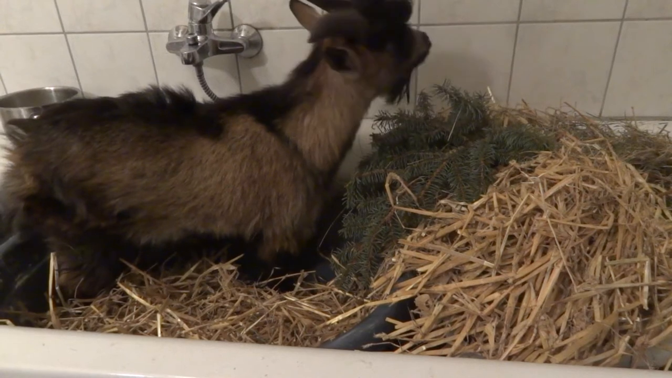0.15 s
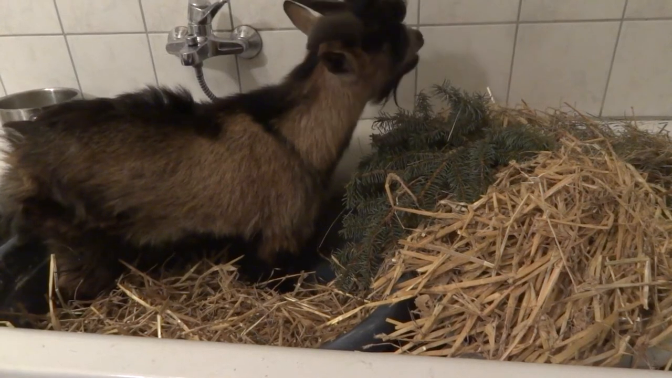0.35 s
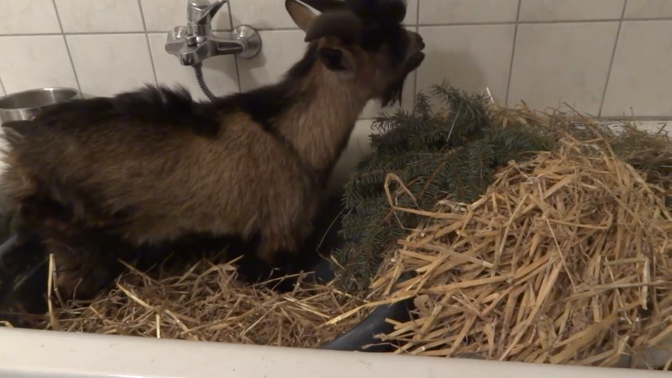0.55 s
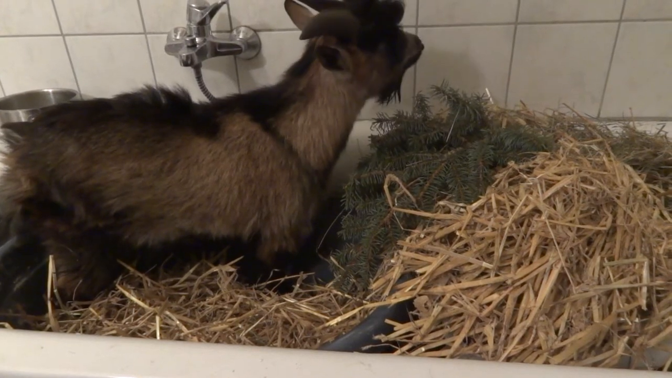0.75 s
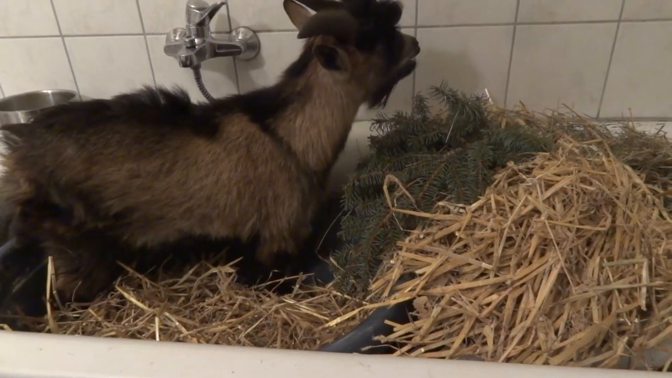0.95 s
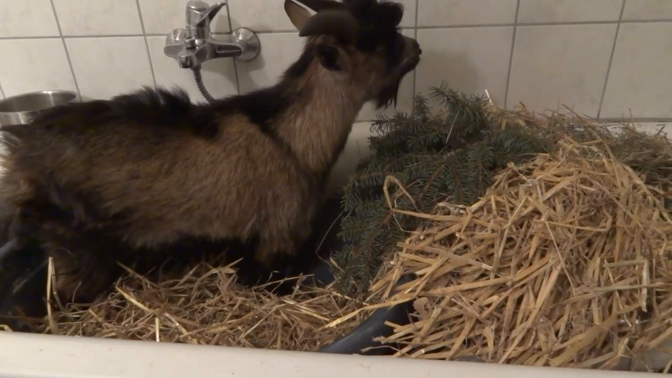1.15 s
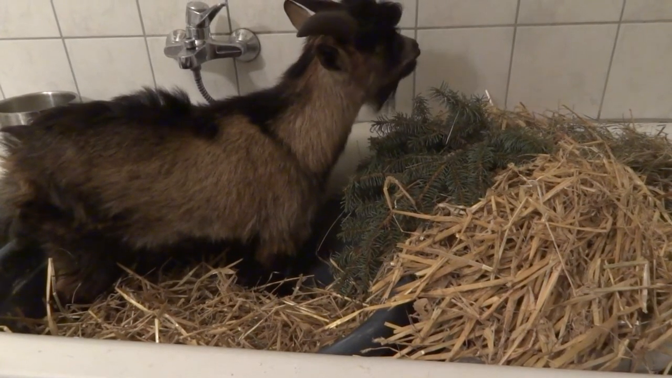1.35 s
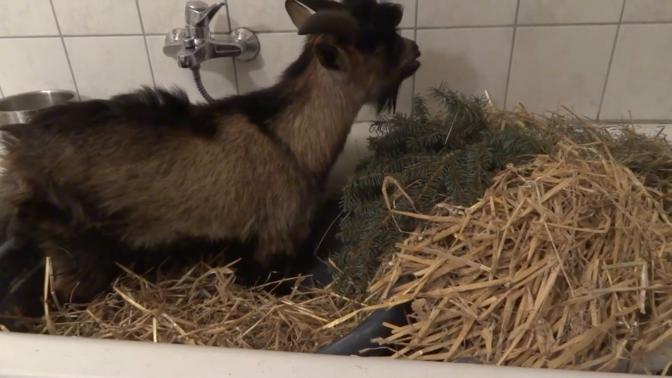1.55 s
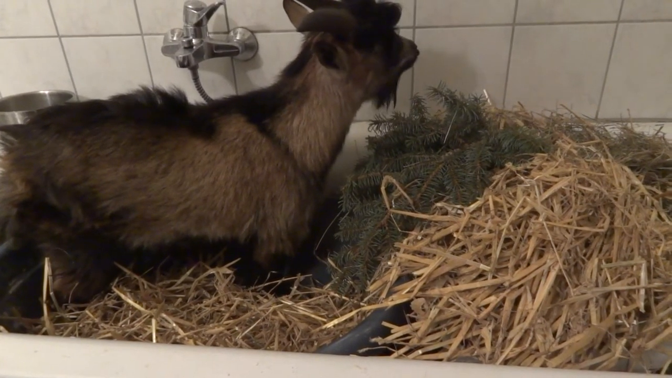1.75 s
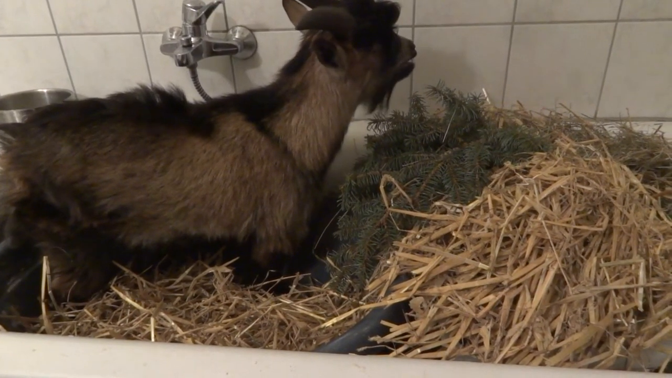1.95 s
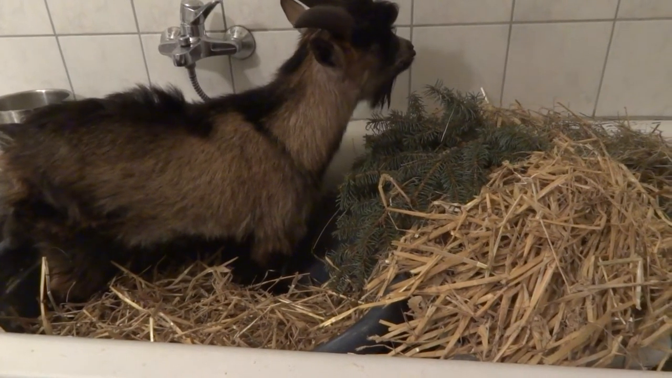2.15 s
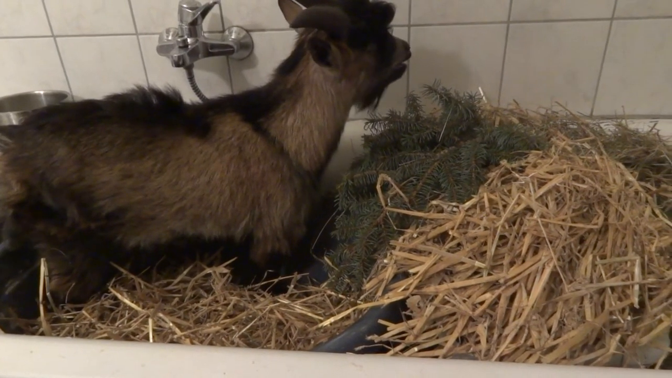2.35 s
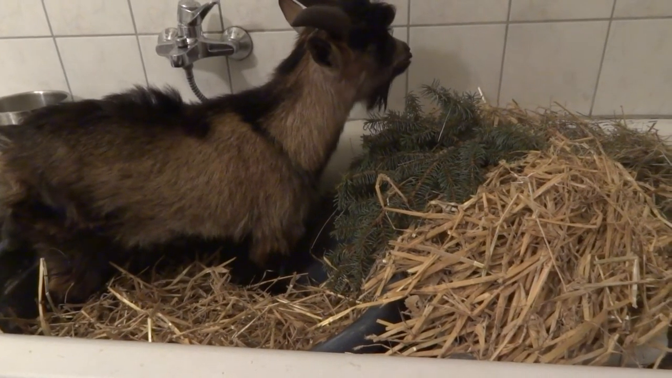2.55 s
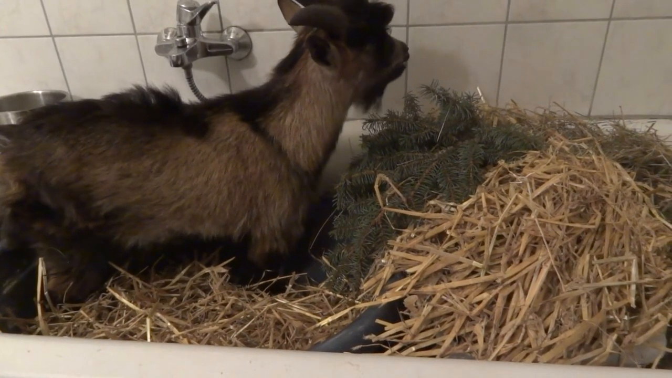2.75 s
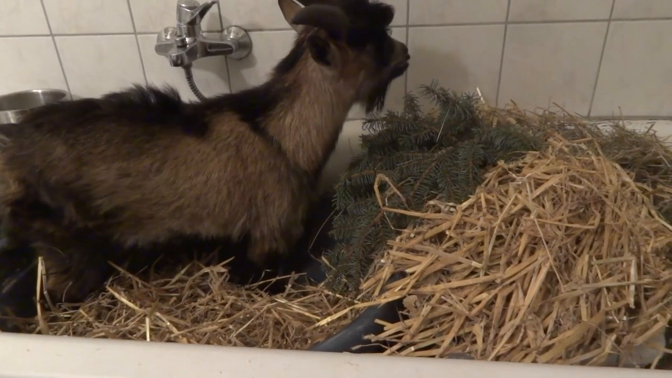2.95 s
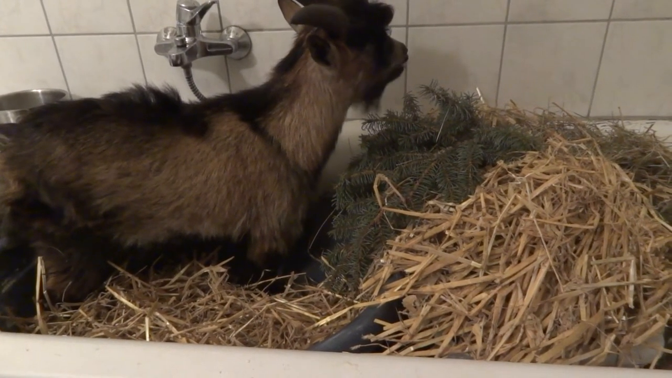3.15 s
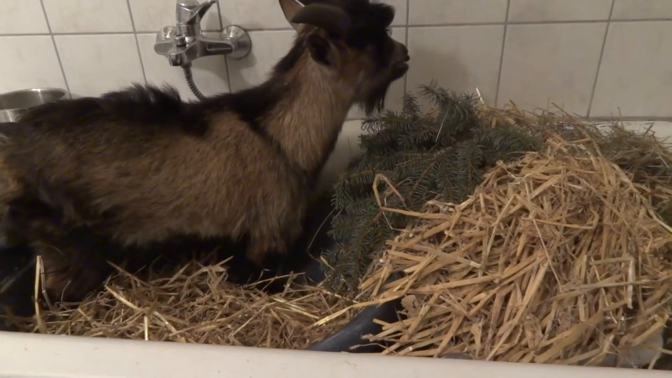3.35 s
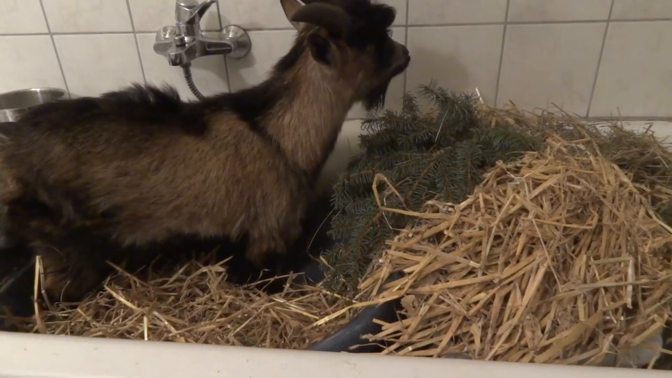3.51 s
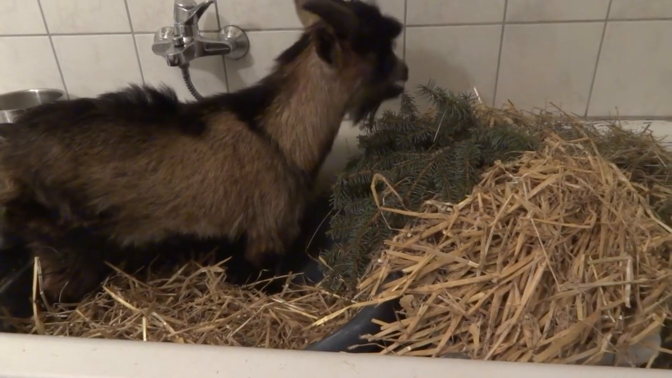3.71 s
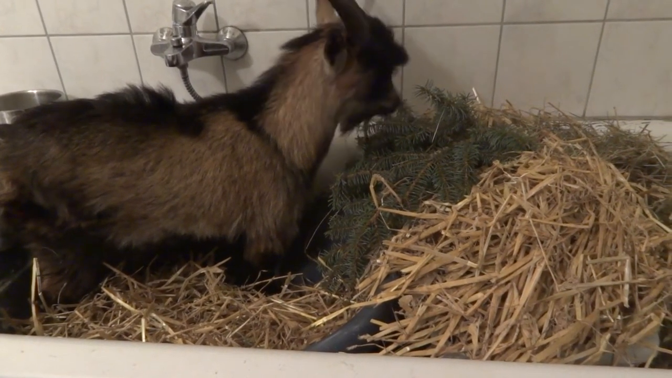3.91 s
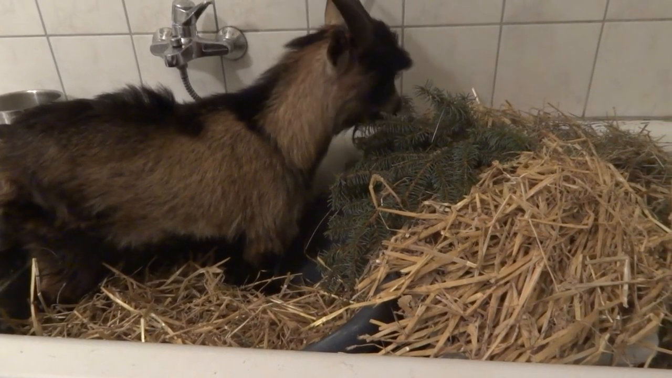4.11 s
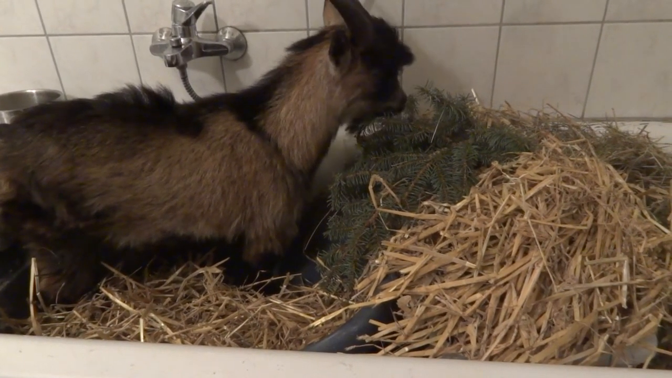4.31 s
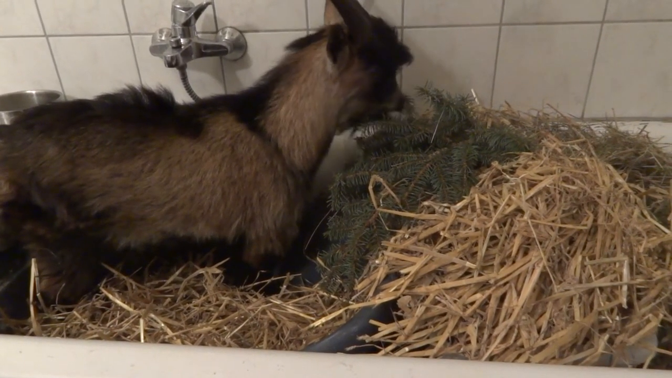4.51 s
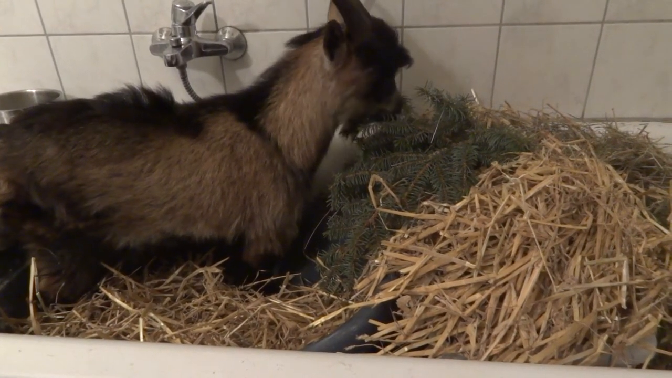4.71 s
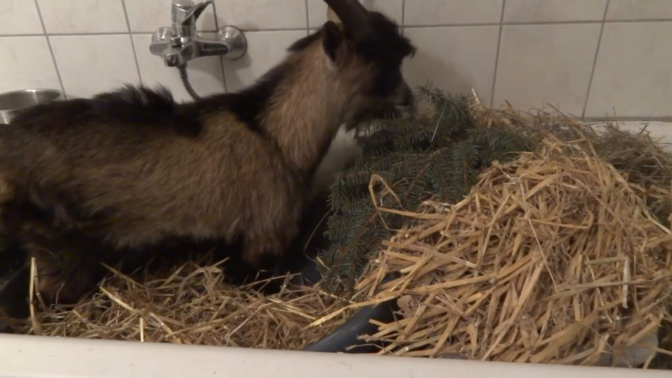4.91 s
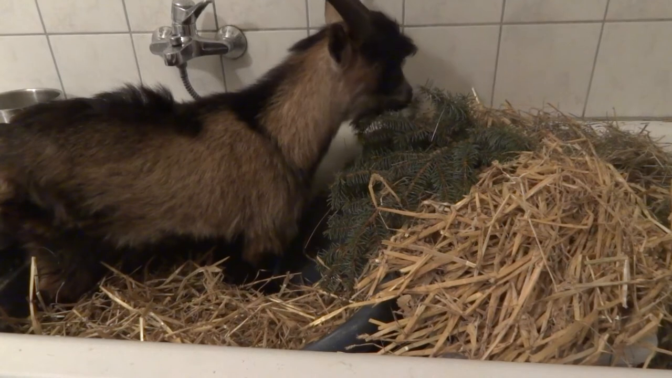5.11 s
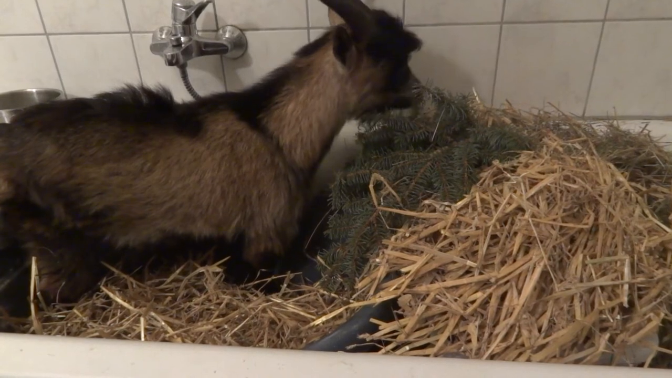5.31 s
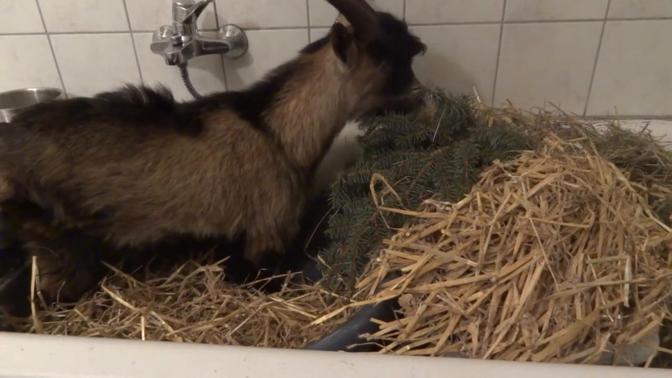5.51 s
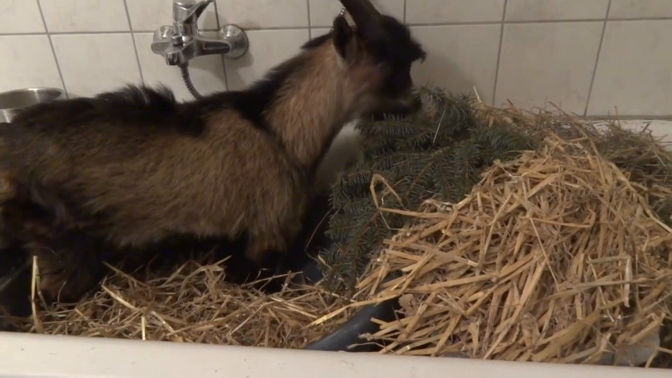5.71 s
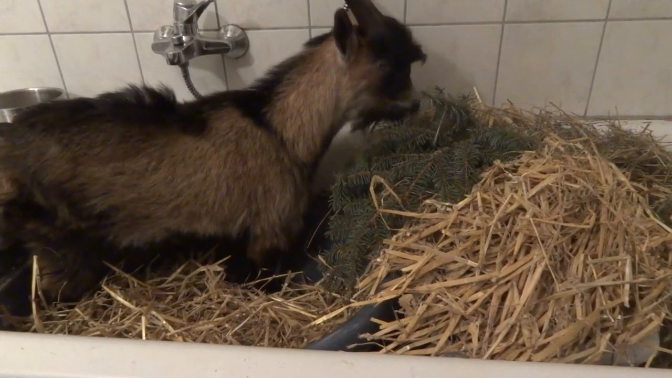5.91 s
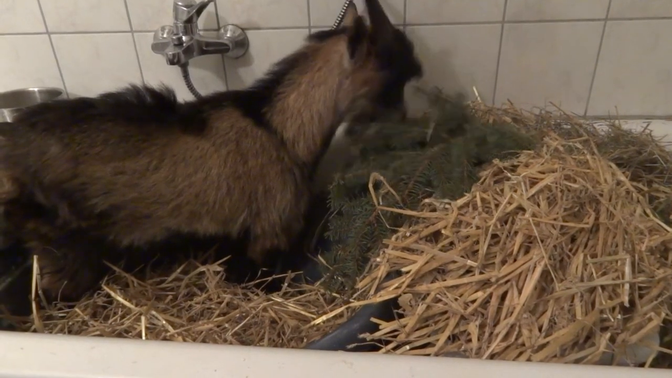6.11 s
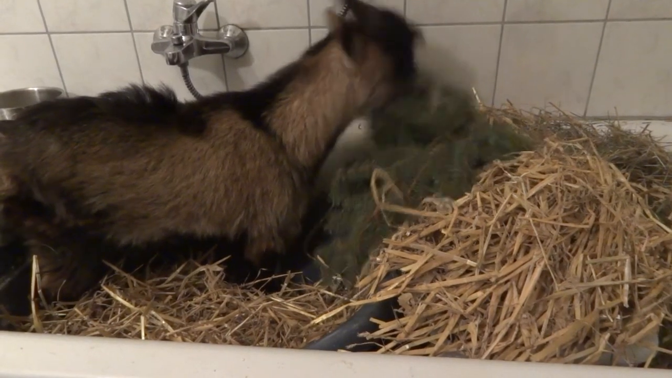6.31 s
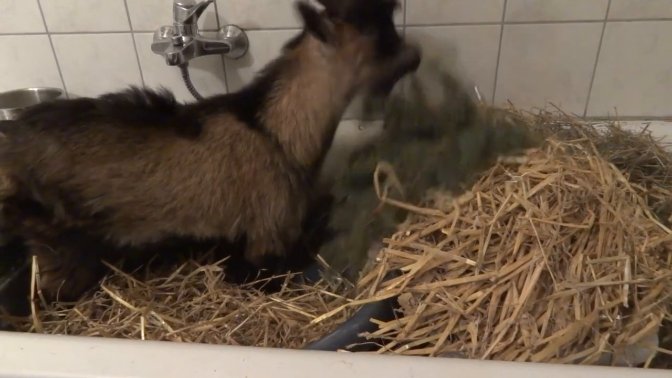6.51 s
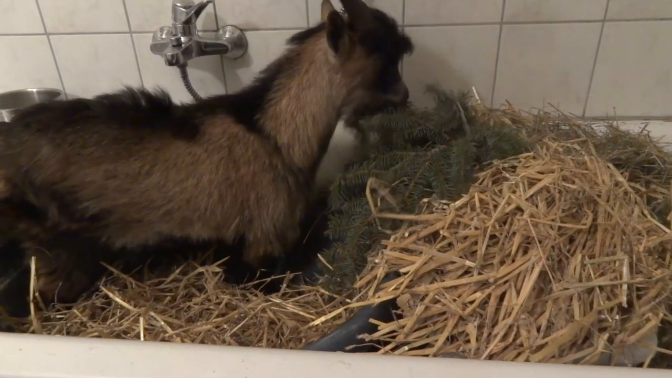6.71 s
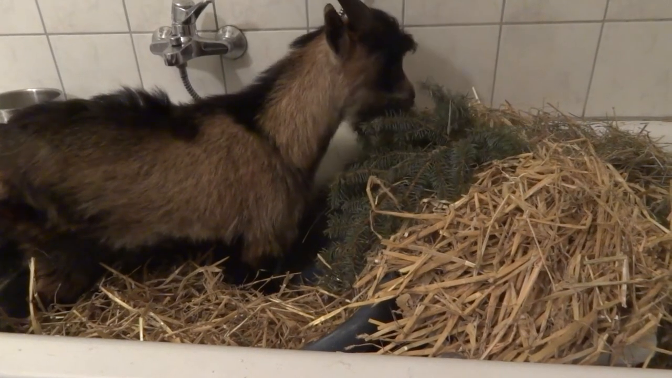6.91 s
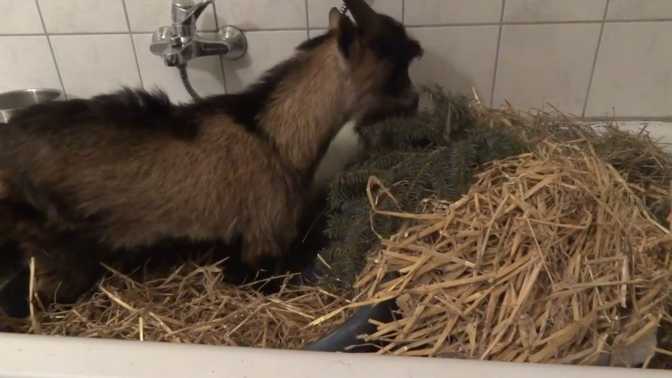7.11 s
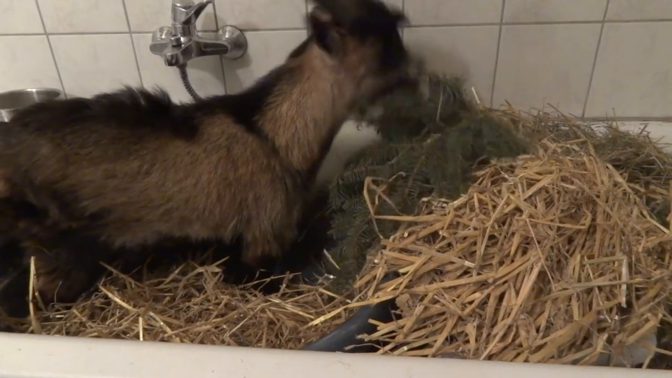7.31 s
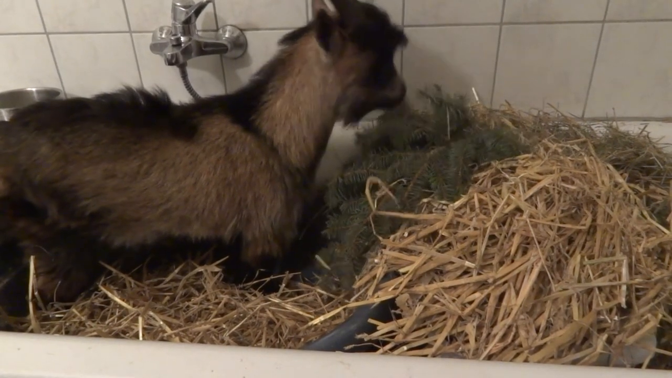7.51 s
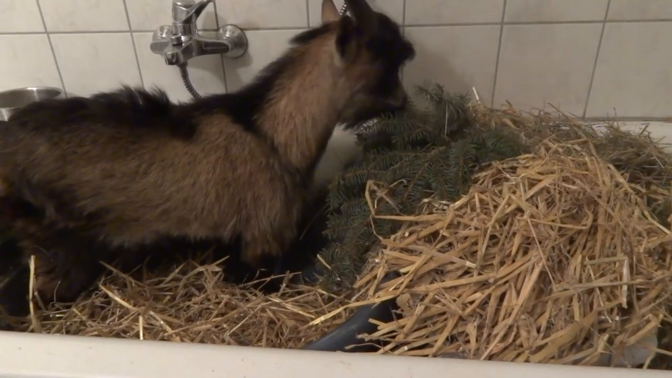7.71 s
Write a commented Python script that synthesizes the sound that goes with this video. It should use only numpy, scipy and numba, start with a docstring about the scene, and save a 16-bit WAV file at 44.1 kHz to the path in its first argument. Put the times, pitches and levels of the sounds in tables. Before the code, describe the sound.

In a quiet tiled bathroom, a nearby microphone picks up a goat steadily grinding and cracking twigs between its teeth, with small lip smacks and ticks of straw. The crunching ends a little past halfway. Then come two louder bursts of rustling evergreen branches with sharp snaps and a low, hollow rumble from the tub. A faint, fast lens motor tick sits in the background.

```python
"""Over faint room noise and a ticking lens motor, a goat crunches fir twigs, about two strokes a second.
It stands on crackling straw in a bathtub in a small tiled room. Each stroke grinds and cracks the twigs
while the mouth's resonance sinks; wet smacks fall in between. Then it tugs at the pile of branches in
two bouts: needles rustle and settle, twigs snap and the tub rumbles beneath."""
import sys
import numpy as np
from scipy import signal
from scipy.fft import rfft, irfft
from scipy.io import wavfile
from numba import njit

SR = 44100
rng = np.random.default_rng(int(sys.argv[2]) if len(sys.argv) > 2 else 0)


def wrap_up_sound(samples):
    """Save the sound to the file named by the first command line argument, as 16-bit audio."""
    columns = np.atleast_2d(samples).T
    # keep every value between -1 and 1, then stretch to whole-number steps
    tamed = np.clip(columns, -1, 1)
    steps = np.round(tamed * 32767).astype(np.int16)
    wavfile.write(sys.argv[1], SR, steps)


N = 341863
T = np.arange(N) / SR


def amp(db):
    """Decibels to gain."""
    return 10 ** (np.asarray(db) / 20)


def unit(x):
    """Scale to rms 1."""
    return x / np.sqrt(np.mean(x ** 2) + 1e-18)


def add(track, start_s, sound):
    """Mix a sound into a track."""
    i = max(int(start_s * SR), 0)
    track[i:i + len(sound)] += sound[:N - i]


def along(points, hz):
    """Read (Hz, value) points on a log-frequency axis."""
    point_hz, value = np.transpose(points)
    return np.interp(np.log(hz + 1), np.log(point_hz), value)


def colour(x, spectrum, size=4096):
    """Minimum-phase filter from (Hz, dB) points; white noise keeps its power."""
    gain = unit(amp(along(spectrum, np.fft.rfftfreq(size, 1 / SR))))
    cepstrum = irfft(np.log(gain))
    cepstrum[1:size // 2] *= 2
    cepstrum[size // 2 + 1:] = 0
    impulse = irfft(np.exp(rfft(cepstrum)))
    return signal.oaconvolve(x, impulse)[:N]


@njit
def resonate(x, hz, width_hz):
    """State-variable band-pass with a moving centre; white noise keeps its power."""
    y = np.empty(len(x))
    band_state, low_state = 0., 0.
    for i in range(len(x)):
        g = np.tan(np.pi * hz[i] / SR)
        damping = width_hz / hz[i]
        band = (band_state + g * (x[i] - low_state)) / (1 + g * (g + damping))
        band_state = 2 * band - band_state
        low_state += 2 * g * band
        y[i] = damping * band
    return y * np.sqrt(SR / (np.pi * width_hz))


def steep_band(x, hz, stage_width_hz):
    """Two resonators in series, centre steady or moving; white noise keeps its power."""
    centre_hz, width_hz = np.full(N, hz, float), float(stage_width_hz)
    once = resonate(x, centre_hz, width_hz)
    return resonate(once, centre_hz, width_hz) * np.sqrt(2 * np.pi * width_hz / SR)


def swell(peak_s, rise_s, fall_s, hold_s=0):
    """A force builds to 1, holds and lets go; rise and fall are time constants."""
    before, after = (peak_s - T) / rise_s, (T - peak_s - hold_s) / fall_s
    return np.exp(-np.maximum(np.maximum(before, after), 0))


def crackle(per_s, spread_db, size=N):
    """Tiny fractures of random time, strength and sign; rms 1."""
    happens = rng.random(size) < per_s / SR
    strength = amp(spread_db * np.minimum(rng.exponential(size=size), 4))
    return unit((happens + 1e-3) * strength * rng.choice([-1, 1], size))


def fracture(length_s):
    """A crack runs through a twig fibre by fibre, fades slightly and stops; rms 1."""
    size = int(length_s * SR) + 8
    fade = np.exp(-0.15 * np.arange(size) / size)
    return unit(crackle(per_s=7000, spread_db=3, size=size) * fade)


# Room noise spectrum. Each row: frequency in Hz, relative level in dB.
AIR_SPECTRUM = [(15, -43), (28, -13), (44, 3.5), (65, -4), (120, -3.5), (280, -4), (600, -4.5), (1100, -6),
                (1900, -9.5), (2800, -15), (5300, -12.5), (8000, -22), (11000, -26)]

def room_noise(mid_db=-70):
    """Quiet steady noise, nearly alike on both sides in the bass."""
    mid, side = (unit(colour(rng.standard_normal(N), AIR_SPECTRUM)) for _ in range(2))
    side_db = along([(60, -12), (600, 1), (2000, 1), (6000, -5)], np.fft.rfftfreq(N, 1 / SR))
    side = irfft(rfft(side) * amp(side_db), N)
    return amp(mid_db) * (mid + np.outer([1, -1], side))


def lens_motor(tick_hz=5300, tick_decay_s=.0022, tick_db=-64.5, whirr_hz=1000, whirr_db=-68):
    """The camera's lens drive ticks fifty times a second and whirrs at every second tick."""
    since_tick_s, since_whirr_s = (T - .018) % .02, (T - .021) % .04
    pulses = rng.standard_normal(N) * np.exp(-since_tick_s / tick_decay_s)
    tick = steep_band(pulses, tick_hz, stage_width_hz=2200)
    age = since_whirr_s / .0025  # each whirr peaks at age 1
    shudders = rng.standard_normal((2, N)) * age * np.exp(1 - age)
    whirr = np.array([steep_band(side, whirr_hz, stage_width_hz=1500) for side in shudders])
    return amp(tick_db) * tick + amp(whirr_db) * whirr


# Jaw strokes. Each row: hardest bite, rise and fall in seconds, relative direct and mouth levels
# in dB, mouth resonance in Hz.
JAW_STROKES = [(0.619, 0.1, 0.089, -58.5, -67.5, 960), (1.173, 0.046, 0.01, -56.5, -55.5, 847),
               (1.68, 0.16, 0.029, -55, -69.5, 765), (2.125, 0.092, 0.037, -55, -63.5, 720),
               (2.565, 0.083, 0.013, -51, -62.5, 640), (2.981, 0.1, 0.034, -58, -67, 570),
               (3.425, 0.077, 0.0054, -52, -60.5, 620), (3.86, 0.045, .03, -55.5, -60, 560),
               (4.307, 0.038, 0.0056, -47.5, -53, 442)]
# Twigs cracking between the teeth. Each row: start in seconds, relative direct and mouth levels in dB.
BITE_CRACKS = [(0.016, -43, -62), (0.462, -40.5, -85), (0.4915, -36.5, -68), (0.5413, -39, -64),
               (0.5906, -28, -56.5), (0.6215, -37, -73), (0.6759, -35.5, -56), (1.043, -37, -67),
               (1.1275, -33.5, -60), (1.1554, -28.5, -63), (1.1932, -35, -52), (1.5459, -39, -72),
               (1.5959, -29.5, -51), (1.6658, -25.5, -38), (2.1016, -32, -70), (2.4745, -37, -70),
               (2.5667, -28.5, -40.5), (2.8032, -51, -58), (2.9744, -39, -51.5), (3.1727, -46, -58.5),
               (3.3386, -41, -63), (3.431, -43, -62), (4.2457, -37, -68), (4.2961, -40, -57)]
# Crunch spectrum. Each row: frequency in Hz, relative level in dB.
CRUNCH_SPECTRUM = [(200, -22), (600, 3), (1350, -5), (1650, 0), (2200, -1.5), (2900, -2), (3500, 1.5),
                   (5200, 3), (6500, -2.5), (8500, 3), (11000, -11)]
# Steady muzzle resonances. Each row: centre in Hz, half the stage width in Hz, gain in dB.
MUZZLE_MODES = [(980, 130, 0), (1120, 130, -7), (1620, 120, -7), (2150, 400, -14)]

def chewing(open_hz=980, glide_s=0.13, sink_ratio=0.9):
    """Molars grind and crack twigs; the sound leaves directly and through the closing mouth."""
    direct, inside, glide = np.zeros(N), np.zeros(N), []
    grind = amp(-1) * crackle(per_s=2200, spread_db=6)
    for bite_s, rise_s, fall_s, direct_db, mouth_db, hz in JAW_STROKES:
        stroke = swell(bite_s, rise_s, fall_s) * grind
        direct += amp(direct_db) * stroke
        inside += amp(mouth_db) * stroke
        # The cavity's pitch sinks through the stroke and recovers as the jaw opens.
        glide += [(bite_s - glide_s, open_hz), (bite_s, hz), (bite_s + glide_s / 2, hz * sink_ratio)]
    for start_s, direct_db, mouth_db in BITE_CRACKS:
        crack = fracture(length_s=0.005)
        add(direct, start_s, amp(direct_db - 12) * crack)
        add(inside, start_s, amp(mouth_db - 3) * crack)
    cavity_hz = np.interp(T, *np.transpose(glide))
    cavity = amp(-1) * steep_band(inside, cavity_hz, stage_width_hz=270)
    muzzle = sum(amp(db) * steep_band(inside, hz, 2 * half_hz) for hz, half_hz, db in MUZZLE_MODES)
    return soften(colour(direct, CRUNCH_SPECTRUM)) + cavity + muzzle


def soften(crunch, split_hz=4000, soak_span_s=(0.5, 2.73)):
    """The mouthful starts dry and crisp and grows duller as it is wetted and ground."""
    low = signal.sosfiltfilt(signal.butter(3, split_hz, fs=SR, output="sos"), crunch)
    low_db = np.interp(T, soak_span_s, [-8, 2])
    high_db = np.interp(T, soak_span_s, [2, -2])
    return amp(low_db) * low + amp(high_db) * (crunch - low)


# Single stalks ticking. Each row: start in seconds, level in dB.
STALK_TICKS = [(.137, -54), (0.28, -54), (.317, -56), (.931, -55.5), (1.473, -51.5), (2.015, -53),
               (2.051, -51), (4.880, -50.5)]
# The goat shifting its weight. Each row: peak, rise and fall in seconds, level in dB.
WEIGHT_SHIFTS = [(.1, .4, 0.29, -64), (1.4, 0.33, .3, -78), (2.334, 0.019, 0.046, -58.5)]
# Spectra of a stalk's tick and of rustling straw or needles. Each row: frequency in Hz, relative dB.
STALK_SPECTRUM = [(1000, -46), (4000, -21), (7000, -29), (9300, -13.5), (11500, -25.5)]
RUSTLE_SPECTRUM = [(300, -27.5), (1200, -21.5), (3000, -11), (4300, -6.5), (5400, -2.5), (6300, -6),
                   (8000, -1), (9800, -3.5), (11200, -13)]

def straw(stir_db=-71.5, fade_db_per_s=1.2):
    """Bedding crackles under the goat's weight, dying down as it stands still; single stalks tick."""
    ticks = np.zeros(N)
    for start_s, db in STALK_TICKS:
        add(ticks, start_s, amp(db) * fracture(length_s=0.0022))
    load = amp(stir_db - fade_db_per_s * T)
    for peak_s, rise_s, fall_s, db in WEIGHT_SHIFTS:
        load = np.hypot(load, amp(db) * swell(peak_s, rise_s, fall_s))
    stir = load * crackle(per_s=1200, spread_db=3.5)
    return colour(ticks, STALK_SPECTRUM) + colour(stir, RUSTLE_SPECTRUM)


# Hooves and branches pushing on the tub. Each row: peak, rise and fall in seconds, relative boom and
# scrape levels in dB, boom pitch in Hz.
TUB_PUSHES = [(.197, 0.012, 0.006, -72, -54.5, 245), (.218, 0.022, 0.018, -55, -85, 149),
              (4.322, 0.011, 0.018, -56.5, -87, 374), (6.155, 0.029, 0.012, -52.5, -50.5, 254),
              (6.23, 0.034, 0.014, -62.5, -64, 420), (6.45, 0.026, 0.013, -48.5, -72, 221),
              (6.535, 0.011, 0.019, -47.5, -42, 400), (6.575, 0.019, 0.046, -59, -56, 186),
              (7.345, 0.058, 0.077, -56.5, -55, 257)]
# Tub modes. Each row: centre in Hz, stage width in Hz, relative gain in dB.
TUB_MODES = [(121, 28, -5.5), (185, 59, -2), (228, 63, 1), (299.6, 51, -0.5), (416.5, 72, 2), (577, 40, 4)]
# Spectra of the tub's body and of wood on its wall. Each row: frequency in Hz, relative level in dB.
BOOM_SPECTRUM = [(30, -28), (70, -1), (110, -4), (170, 6.5), (300, -12), (450, -2.5), (700, 3.5),
                 (1500, -33.5)]
SCRAPE_SPECTRUM = [(150, -28.5), (400, -6.5), (700, 2), (1000, 6.5), (1400, -4.5), (2200, -5.5),
                   (5000, -24.5)]

def tub(reach_octaves=0.57, body_db=-6, ring_db=-2):
    """Uneven pushes make the tub boom; wood scrapes along its wall."""
    boom, scrape, ring = np.zeros((3, N))
    pitch_hz = np.full(N, TUB_PUSHES[0][5], float)
    for peak_s, rise_s, fall_s, boom_db, scrape_db, hz in TUB_PUSHES:
        push = swell(peak_s, rise_s, fall_s)
        boom += amp(boom_db) * push
        scrape += amp(scrape_db) * push
        pitch_hz[int((peak_s - rise_s) * SR):] = hz
    boom *= crackle(per_s=1700, spread_db=-3)
    scrape *= crackle(per_s=1500, spread_db=3)
    for hz, width_hz, db in TUB_MODES:
        # Where a push lands decides which modes it reaches.
        detuning = np.log2(hz / pitch_hz) / reach_octaves
        ring += amp(db) * steep_band(boom / (1 + detuning ** 2), hz, width_hz)
    body = colour(boom, BOOM_SPECTRUM)
    return amp(body_db) * body + amp(ring_db) * ring + colour(scrape, SCRAPE_SPECTRUM)


# Tongue and lip smacks. Each row: start in seconds, twice the decay time in seconds, level in dB,
# pitch in Hz.
LIP_SMACKS = [(1.47, 0.17, -77, 3800), (1.862, 0.1, -74.5, 3250), (2.001, 0.01, -64, 3960),
              (2.302, 0.027, -67.5, 3440), (2.41, 0.026, -71.5, 4380), (2.71, 0.038, -75.5, 2600),
              (3.18, 0.063, -75.5, 3850), (3.294, 0.009, -64.5, 3850), (3.617, 0.012, -66.5, 3640),
              (3.804, 0.0092, -58.5, 3870), (4.056, 0.013, -64.5, 3570), (4.17, 0.063, -76, 3740),
              (4.55, 0.015, -76.5, 4340), (4.726, 0.0047, -65.5, 3350), (5.08, 0.0078, -74, 4300),
              (5.231, 0.0065, -65.5, 4100)]

def smacks(spray_db=-9):
    """Saliva films burst in a small pocket behind the lips."""
    pops, pocket_hz = np.zeros(N), np.full(N, LIP_SMACKS[0][3], float)
    for start_s, length_s, db, hz in LIP_SMACKS:
        decay_samples = length_s / 2 * SR
        size = int(3 * decay_samples) + 8
        fade = np.exp(-np.arange(size) / decay_samples)
        burst = np.sqrt(3) * unit(crackle(per_s=1800, spread_db=-0.5, size=size) * fade)
        add(pops, start_s, amp(db) * burst)
        pocket_hz[int(start_s * SR):] = hz
    return resonate(pops, pocket_hz, width_hz=900.) + amp(spray_db) * colour(pops, CRUNCH_SPECTRUM)


# Tugs and shoves at the pile. Each row: peak, rise, hold and fall in seconds, relative needle and twig
# levels in dB, twig pitch in Hz.
BRANCH_TUGS = [(5.77, 0.04, 0.14, 0.054, -58, -74, 1230), (6.142, 0.041, 0.029, 0.053, -44, -61.5, 1900),
               (6.34, 0.044, 0.02, 0.045, -32, -45.5, 3030), (6.407, .02, 0.012, 0.031, -35.5, -49.5, 1490),
               (6.514, 0.075, 0.058, 0.053, -35, -59, 2380), (7.295, 0.069, 0.011, 0.027, -44, -60, 3000),
               (7.384, 0.033, 0.047, 0.062, -38, -59, 2700), (7.461, .022, 0.0062, 0.014, -39, -46, 2500)]
# Dry twigs snapping. Each row: start in seconds, bright tick in dB, woody knock in dB.
TWIG_SNAPS = [(5.804, -62, -46), (5.826, -42.5, -54), (6.365, -44, -39), (6.404, -22.5, -60),
              (6.459, -29.5, -63), (7.278, -35, -54), (7.31, -30.5, -64), (7.315, -23.5, -67),
              (7.322, -26.5, -64)]

def branches(settle_db=-16, settle_s=0.19):
    """Needles flick past each other, stiffer twigs rub and snap; the pile settles after each tug."""
    motion, rubbing, glide = np.zeros(N), np.zeros(N), []
    for peak_s, rise_s, hold_s, fall_s, needle_db, twig_db, hz in BRANCH_TUGS:
        settling = amp(settle_db) * swell(peak_s, rise_s, settle_s, hold_s)
        pull = np.maximum(swell(peak_s, rise_s, fall_s, hold_s), settling)
        motion = np.hypot(motion, amp(needle_db) * pull)
        rubbing = np.hypot(rubbing, amp(twig_db) * pull)
        glide.append((peak_s, hz))
    needles = motion * crackle(per_s=6000, spread_db=4)
    twigs = amp(-3) * rubbing * crackle(per_s=2700, spread_db=5)
    for start_s, tick_db, knock_db in TWIG_SNAPS:
        snap = fracture(length_s=0.0018)
        add(needles, start_s, amp(tick_db) * snap)
        add(twigs, start_s, amp(knock_db) * snap)
    twig_hz = np.interp(T, *np.transpose(glide))
    return colour(needles, RUSTLE_SPECTRUM) + steep_band(twigs, twig_hz, stage_width_hz=2000)


# Ring of the tiled room. Each row: frequency in Hz, time to fall 60 dB in seconds.
ROOM_T60 = [(100, 0.48), (500, 0.42), (1400, 0.4), (3700, 0.37), (10000, 0.1)]

def reflections(early_db=-7, early_peak_s=0.0013, gap_s=.006, bands=9):
    """Two-ear response: quick reflections from tub and wall, then the ring of the tiles."""
    t = T[:SR * 3 // 5]
    hz = np.fft.rfftfreq(len(t), 1 / SR)
    side_gain = amp(along([(200, -12), (1000, -2), (3000, -8)], hz))
    mid, side = rfft(rng.standard_normal((2, len(t))))
    diffuse = (mid + np.outer([1, -1], side_gain * side)) / np.sqrt(1 + side_gain ** 2)
    early = amp(early_db) * unit(t * np.exp(-t / early_peak_s))
    centres_hz = np.geomspace(60, 14000, bands)
    response = np.zeros((2, len(t)))
    for centre_hz, weights in zip(centres_hz, np.eye(bands)):
        band = irfft(diffuse * along(np.c_[centres_hz, weights], hz), len(t))
        late = unit(amp(-60 * t / along(ROOM_T60, centre_hz)) * (t > gap_s))
        late *= amp(along([(700, 4), (5000, -1)], centre_hz))
        response += band * np.hypot(late, early) / np.sqrt(len(t))
    return response


def tiled_room(x, shift_s=.12, responses=4, gain_db=-3, shadow_hz=700, shadow_db=-3, lag_samples=.6):
    """Reflections keep changing as head and branches move; the goat is slightly to the right."""
    phase = np.pi * (T / shift_s + np.arange(responses)[:, None]) / responses
    crossfades = np.cos(phase) ** 4
    crossfades /= np.sqrt(np.sum(crossfades ** 2, axis=0))
    wet = sum(signal.oaconvolve((x * fade)[None], reflections(), axes=1)[:, :N] for fade in crossfades)
    left, right = amp(gain_db) * (x + wet)
    # The left ear hears it later and with less treble.
    bass = signal.sosfilt(signal.butter(1, shadow_hz, fs=SR, output="sos"), left)
    shadowed = bass + amp(shadow_db) * (left - bass)
    delay = np.sinc(np.arange(-8, 9) - lag_samples) * np.hanning(17)
    return np.array([np.convolve(shadowed, delay, "same"), right])


def scene():
    """Goat, straw, branches and tub in the tiled room, over room noise and the lens motor."""
    goat = chewing() + smacks() + straw() + branches() + tub()
    return tiled_room(goat) + room_noise() + lens_motor()


def record(dry):
    """The camera cuts the treble steeply above 11.2 kHz."""
    return signal.sosfilt(signal.ellip(12, .2, 70, 11200, fs=SR, output="sos"), dry)


dry = scene()
out = record(dry)
wrap_up_sound(out)
```